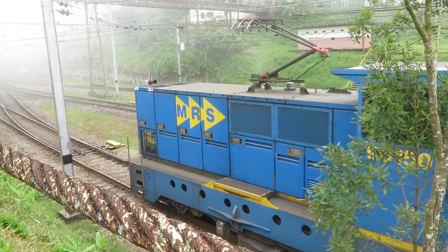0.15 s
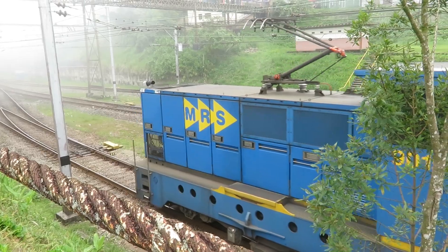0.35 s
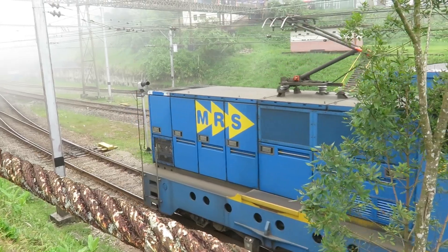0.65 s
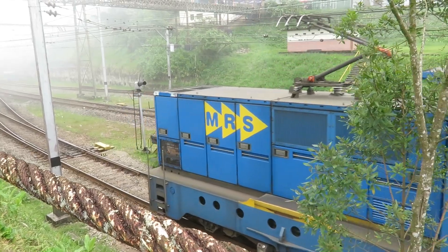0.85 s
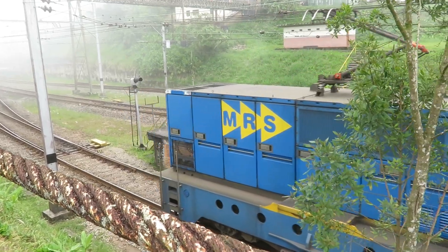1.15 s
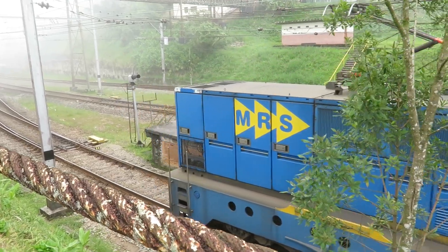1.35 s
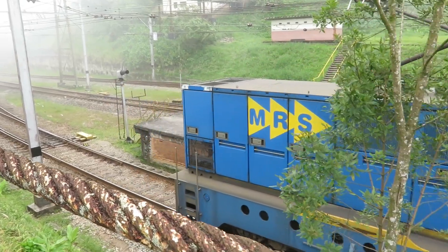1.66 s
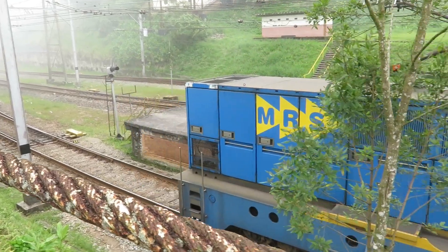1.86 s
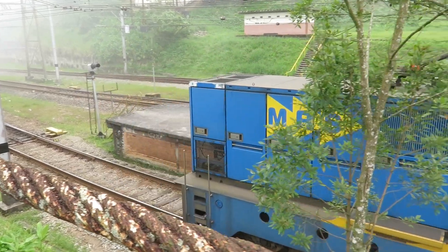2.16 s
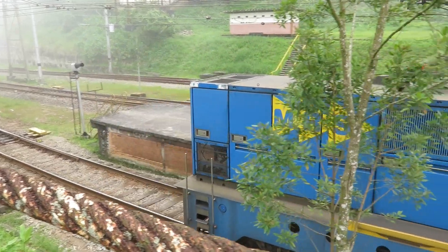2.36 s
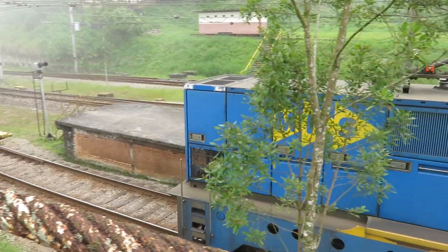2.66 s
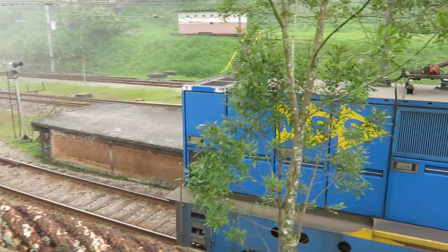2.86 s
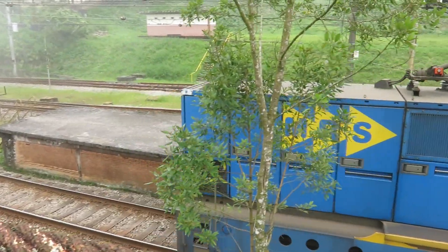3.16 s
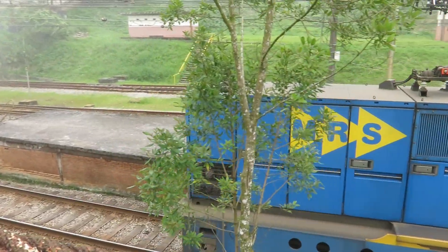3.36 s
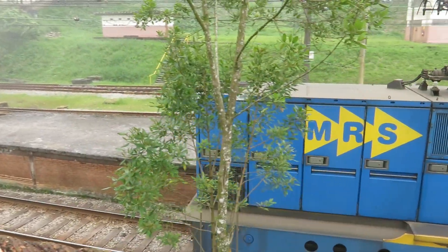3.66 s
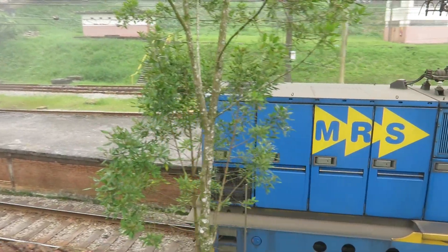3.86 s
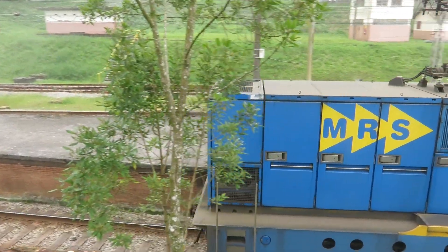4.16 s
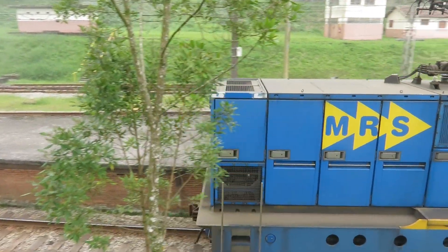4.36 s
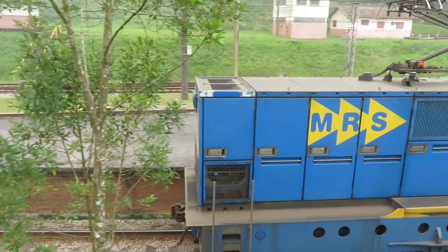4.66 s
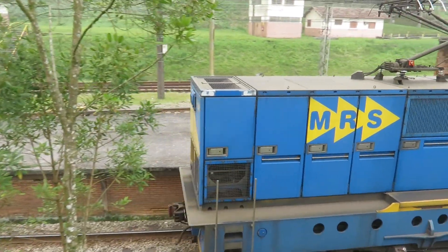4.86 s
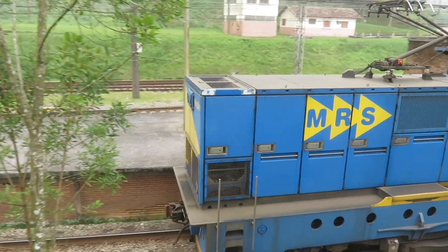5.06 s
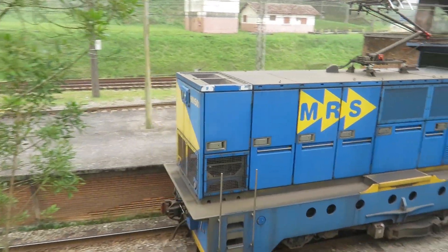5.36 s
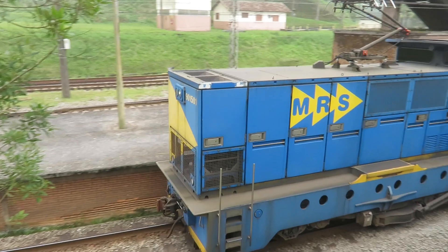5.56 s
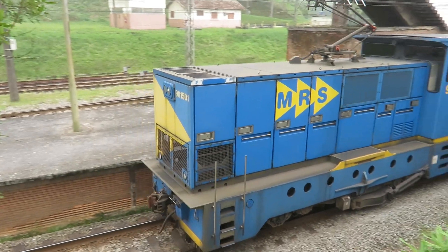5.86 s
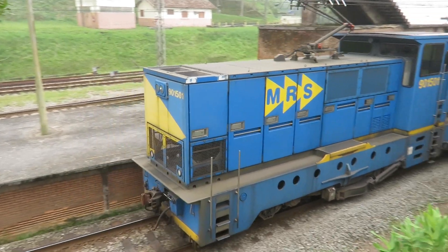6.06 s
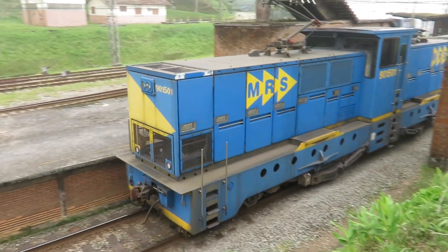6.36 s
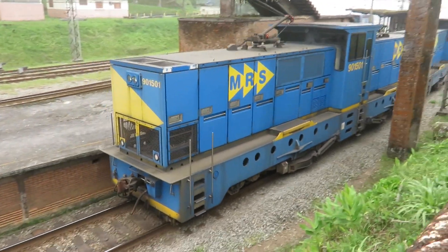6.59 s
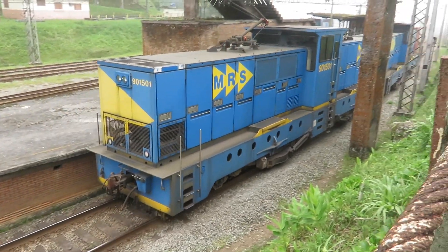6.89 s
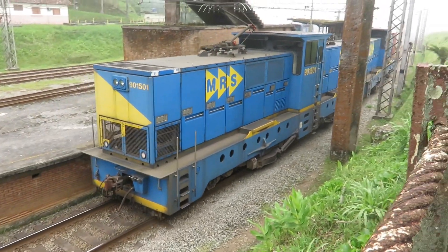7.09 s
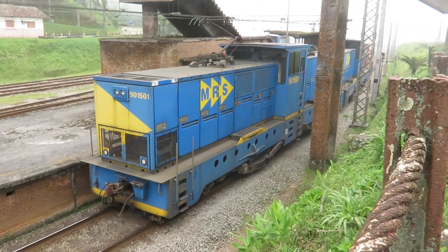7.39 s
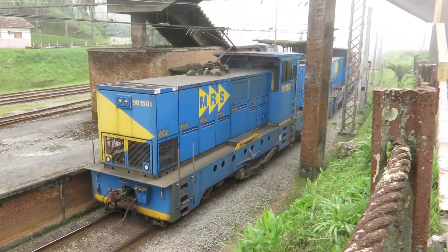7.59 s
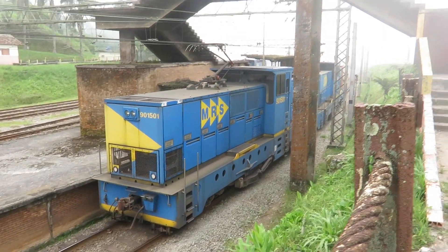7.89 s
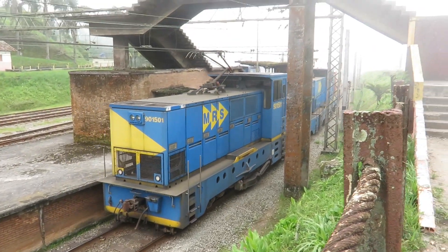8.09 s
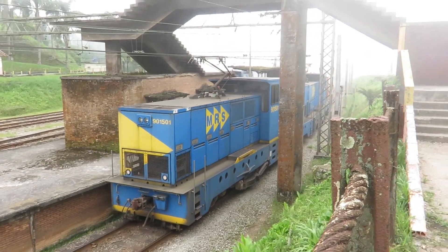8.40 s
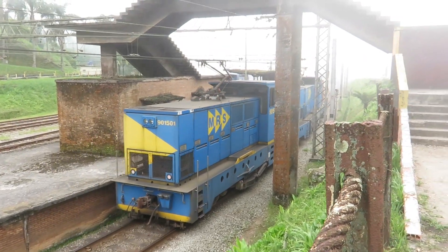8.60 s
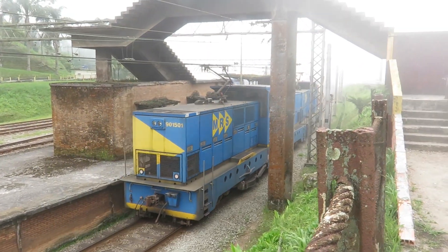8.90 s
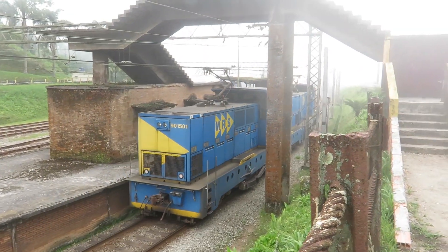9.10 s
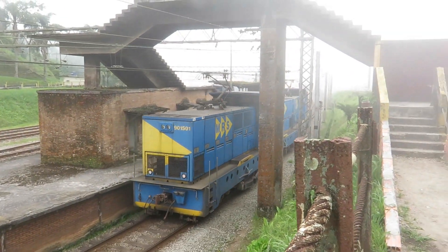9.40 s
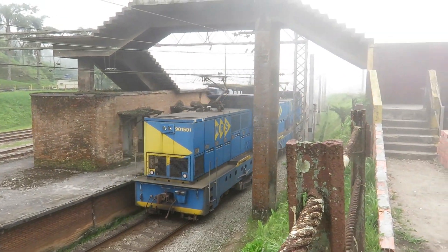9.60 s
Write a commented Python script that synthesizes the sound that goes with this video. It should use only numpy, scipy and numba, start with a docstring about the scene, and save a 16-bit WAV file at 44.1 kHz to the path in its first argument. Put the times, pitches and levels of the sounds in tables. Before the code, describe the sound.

Rolling roar and a siren-like whine from passing locomotives, broken by harsh wheel squeals, metallic clanks, gritty scuffs and a brief air hiss.

```python
"""Locomotives on a tight curve

Two electric locomotives roll slowly past in a rail yard, a few metres below the microphone.
Wheel flanges screech, sing and scuff as wheel modes and shaped noise; axles clank, rattle and thud over joints.
Compressed air bursts out once; a blower whines in steady lines over the flickering noise of rolling.
A camera's gain control ducks whenever the sound passes its limit, then creeps back."""
import sys
import numpy as np
from scipy import signal
from scipy.fft import rfft, irfft, next_fast_len
from scipy.io import wavfile
from scipy.ndimage import uniform_filter1d
from numba import njit

SR = 44100
rng = np.random.default_rng(int(sys.argv[2]) if len(sys.argv) > 2 else 0)


def transcribe(signal):
    """Save signal, clipped to [-1, 1], as a 16-bit WAV file at the path in sys.argv[1]."""
    frames = np.atleast_2d(signal).T
    limited = np.clip(frames, -1, 1)
    pcm = np.round(limited * 32767).astype(np.int16)
    wavfile.write(sys.argv[1], SR, pcm)


N = 429534
T = np.arange(N) / SR
TOP_HZ = 15600  # treble cut-off of the camera


def undb(db):
    """Decibels to gain."""
    return 10 ** (np.asarray(db) / 20)


def unit(x):
    """Scale to rms 1."""
    return x / np.sqrt(np.mean(np.abs(x) ** 2))


def curves(table, t):
    """The columns of a table of timed rows, at times t."""
    s, *columns = np.transpose(table)
    return [np.interp(t, s, c) for c in columns]


def envelope(t, rise, hold, t60):
    """Gain that rises from t = 0, holds, then dies away by 60 dB in t60 seconds."""
    fall_s = np.maximum(t - rise - hold, 0)
    return np.clip(t / rise, 0, 1) * undb(-60 * fall_s / t60)


def db_at(points, hz):
    """A spectrum of (frequency [Hz], level [dB]) points, joined on a log axis."""
    f, db = np.transpose(points)
    return np.interp(np.log(np.maximum(hz, 1)), np.log(f), db)


def shape(x, gain):
    """Filter by a gain that is a function of frequency."""
    size = next_fast_len(len(x), True)
    spectrum = rfft(x, size) * gain(np.fft.rfftfreq(size, 1 / SR))
    return irfft(spectrum, size)[:len(x)]


def noise(points, size):
    """Noise of a given colour, rms 1."""
    return unit(shape(rng.standard_normal(size), lambda f: undb(db_at(points, f))))


def bell(f, hz, width):
    """Power gain of one resonance."""
    return 1 / (1 + (2 * (f - hz) / width) ** 2)


def lift(resonances, f):
    """Gain of a set of (frequency [Hz], width [Hz], lift [dB]) resonances."""
    return undb(sum(db * bell(f, hz, width) for hz, width, db in resonances))


def walk(rate, size):
    """Smooth chance with spread near 1, changing about rate times a second."""
    step = max(int(SR / rate), 2)
    own = np.random.default_rng(rng.integers(2 ** 31))
    held = np.repeat(own.standard_normal(size // step + 3), step)
    smooth = uniform_filter1d(uniform_filter1d(held, step), step)
    return 1.35 * smooth[step:step + size]


def tone(hz, steady, flutter_rate):
    """A partial on a pitch curve: a steady direct part plus scattered parts that flutter; rms 1."""
    phase = 2 * np.pi * (np.cumsum(hz) / SR + rng.random())
    direct = (steady + walk(flutter_rate, len(hz))) * np.sin(phase)
    scattered = walk(flutter_rate, len(hz)) * np.cos(phase)
    return unit(direct + scattered)


def add(track, start, x):
    """Mix x into the track from a start time."""
    i = max(int(start * SR), 0)
    track[i:i + len(x)] += x[:N - i]


# Flange screeches: (start [s], length [s], level trim [dB], grinding trim [dB],
# contact at start, contact at end [0 flange root - 1 flange tip], pitch unsteadiness [share])
SCREECH_EVENTS = [(1.311, 0.34, -6, -6.5, 0, 0.7, .008), (1.655, 0.055, -13.5, -6, 0.7, .8, .003),
                  (1.712, 0.05, -8, -7, 0.9, .7, .003), (4.9575, 0.24, 0, -6, 0.3, 1, .01)]
# The wheel's modes: (frequency [Hz], drive from the flange root [dB], drive from the flange tip [dB])
WHEEL_MODES = [(1650, -9, -1), (1790, -3, 0), (1920, 0, -6), (2070, 1, -2), (2280, 8, 0), (2350, 5, 3),
               (2440, -1, 2), (2630, -2, -1), (2890, -12, 0), (3070, -9, 3), (3180, -5, -1), (3880, -2, -3),
               (4600, 3, -2), (4880, -7, -3), (5300, -5, 2), (5850, -7, -14), (6170, -4, 0), (6960, 0, -4),
               (7740, -6, -2), (8560, -11, -7), (9360, 0, -5), (10080, -5, -5), (10750, -2, -2),
               (11050, -6, -3), (11480, -1, -2), (11650, 1, -1), (12250, -7, 0), (12480, -2, -3),
               (13130, -2, -4), (13850, -5, -6)]
# Colour of the grinding: (frequency [Hz], relative level per Hz [dB])
GRIND_COLOUR = [(100, -37), (300, -5), (1000, 16), (1400, 12), (1800, 1), (2400, 6), (2800, 7), (4000, 13),
                (5000, 9), (8300, 9), (11500, 4.5), (13500, 5.5), (15500, 2)]
SCREECH_ATTACK_S, SQUEAL_T60_S, GRIND_T60_S = .006, 0.03, 0.093
BITE_DB, BITE_S = 2, .002  # the flange's first blow on the rail: extra squeal and its time constant


def screeches(grind_db=-3.5, squeal_db=-5.0, rasp_db=1.6):
    """A flange strikes the rail, then sticks and slips; as the contact slides, other wheel modes take over."""
    out = np.zeros(N)
    t = np.arange(2 * SR // 3) / SR
    twin_db, twin_spread = -5, .014  # the axle's other wheel slides in and out of tune
    swap_db = 4.5  # how far each mode's drive wanders
    ring_gain, ring_width_hz = 1.2, 130  # wheel modes standing out of the grinding

    def grind_rings(f):
        return 1 + ring_gain * sum(bell(f, mode[0], ring_width_hz) for mode in WHEEL_MODES)

    for start, length, db, grinding_db, first, last, unsteady in SCREECH_EVENTS:
        contact = np.clip(np.interp(t, [0, length], [first, last]), 0, 1)
        pull = 1 + unsteady * walk(55, len(t))  # uneven friction pulls the pitch
        squeal = 0
        for hz, root, tip in WHEEL_MODES:
            twin_hz = hz * (1 + twin_spread * walk(18, len(t)))
            contact_db = root + (tip - root) * contact
            for mode_hz, wheel_db in [(hz, 0), (twin_hz, twin_db)]:
                drive_db = wheel_db + contact_db + swap_db * walk(40, len(t))
                squeal = squeal + undb(drive_db) * tone(mode_hz * pull, steady=1.0, flutter_rate=170)
        bite_db = BITE_DB * np.exp(-t / BITE_S)
        squeal = unit(squeal) * undb(squeal_db + bite_db)
        squeal *= envelope(t, SCREECH_ATTACK_S, length, SQUEAL_T60_S)
        grind = unit(shape(noise(GRIND_COLOUR, len(t)), grind_rings))
        grind *= undb(grind_db + grinding_db) * envelope(t, SCREECH_ATTACK_S, length, GRIND_T60_S)
        rasp = rasp_db * walk(228.0, len(t))
        add(out, start, (squeal + grind) * undb(db + rasp))
    return out


# Single wheel modes: (start [s], rise [s], hold [s], settled pitch [Hz], level trim [dB], t60 [s],
# flutter rate [Hz], pitch offset at the start [Hz])
SINGING_MODES = [ (1.311, .006, .02, 1975, -6.5, .12, 120, 0), (1.310, .003, .008, 6240, -20, .06, 200, 0),
                 (1.312, .012, .11, 2295, -9.5, .15, 150, 50), (1.35, .045, .04, 4620, -10, .1, 130, 70),
                 (1.45, .01, .03, 7020, -15.5, .15, 140, 0), (1.51, .04, .07, 6180, -16, .2, 180, 0),
                 (1.555, .01, .07, 2440, -13.5, .15, 120, -70), (1.57, .02, .17, 3080, -19, .15, 130, 60),
                 (1.685, .01, .035, 6190, -17, .13, 120, 40), (1.712, .008, .04, 2360, -12.5, .24, 90, 110),
                 (1.712, .01, .04, 5445, -18.5, .15, 110, 0), (2.644, .019, .06, 2106, -18.5, 1.1, 30, 0),
                 (2.67, .03, .13, 4210, -40, .4, 220, 200), (2.65, .02, .16, 6300, -41.5, .3, 260, 120),
                 (2.8, .05, .02, 2106, -19.5, .7, 28, 0), (2.97, .1, .04, 2106, -20.5, .7, 30, 0),
                 (4.958, .001, .038, 2305, -1, .08, 323, 0), (4.958, .001, .038, 2490, -4, .08, 350, 0),
                 (5.075, .02, .035, 2315, -8.5, .14, 160, 90), (5.075, .01, .02, 2630, -10, .1, 160, 0),
                 (5.13, .03, .04, 5260, -15.5, .42, 180, 0), (5.16, .03, .03, 6125, -19.5, .36, 180, 0),
                 (5.25, .05, .04, 2850, -17.5, .35, 55, 0), (5.41, .025, .03, 2848, -16, .8, 60, 0),
                 (5.204, .05, .38, 3628, -27.5, 1.7, 55, 0), (5.8, .15, .75, 3635, -43, .6, 70, 0),
                 (6.405, .03, .02, 3085, -31, .22, 90, 50), (6.718, 0.035, 0.12, 5350, -35, .46, 183, 38),
                 (6.73, 0.044, 0.11, 6170, -48, .5, 200, 4), (6.73, .04, 0.09, 10680, -45, .5, 400, 0),
                 (8.067, .026, .14, 3670, -42.5, .5, 70.4, 7), (8.07, .02, 0.067, 6100, -45, 0.54, 159, 2),
                 (9.34, 0.0071, .01, 10200, -21.5, 0.39, 1026, 7)]
OVERTONE_DB = -35  # each overtone, relative to its pitch
PAIR_BEAT_HZ, PAIR_DEPTH = 16, .33  # a turning wheel splits each mode into a close pair: beat rate, depth (share)
SETTLE_S = .06  # time constant with which a mode settles on its pitch


def singing(steady=2.4):
    """Creep on the rail keeps wheel modes ringing and beating, with faint overtones; some glide onto pitch."""
    out = np.zeros(N)
    for start, rise, hold, hz, db, t60, flutter, offset_hz in SINGING_MODES:
        t = np.arange(int((rise + hold + t60) * SR)) / SR
        pitch = hz + offset_hz * np.exp(-t / SETTLE_S)
        overtones = sum(tone(k * pitch, steady, k * flutter) for k in (2, 3) if k * hz < TOP_HZ)
        ring = tone(pitch, steady, flutter) + undb(OVERTONE_DB) * overtones
        beat = 1 + PAIR_DEPTH * np.cos(2 * np.pi * PAIR_BEAT_HZ * (t - rise))
        add(out, start, ring * beat * undb(db) * envelope(t, rise, hold, t60))
    return out


# Short flange scuffs: (start [s], level trim [dB], length [s], centre of the treble lift [Hz])
SCUFF_EVENTS = [(0.045, -34, 0.026, 11200), (0.148, -37, 0.045, 11600), (0.467, -30, 0.042, 10900),
                (0.721, -25, 0.046, 11700), (0.801, -33, 0.045, 11600), (0.936, -29.5, 0.038, 11200),
                (1.19, -34, 0.035, 11400), (1.985, -38, 0.045, 11500), (2.278, -37, 0.11, 11430),
                (2.643, -25, 0.062, 11700), (2.837, -35.5, 0.11, 12100), (2.97, -34, 0.034, 10600),
                (3.193, -34, 0.029, 10800), (3.926, -31, 0.038, 12000), (4.373, -28.5, 0.075, 12300),
                (4.923, -20, 0.047, 12900), (5.77, -29.5, 0.044, 12000), (6.196, -32, 0.015, 13200),
                (6.223, -24.5, 0.013, 12100), (6.551, -19, 0.022, 11900), (6.576, -11, 0.0098, 10300),
                (6.59, -13, 0.0066, 11300), (6.737, -36.5, 0.12, 11500), (7.222, -25.5, 0.013, 11700),
                (7.421, -26, 0.037, 12200), (7.468, -14.5, 0.041, 11700), (7.524, -22.5, 0.11, 12600),
                (7.822, -21.5, 0.03, 11700), (7.92, -22.5, 0.032, 12000), (7.977, -24.5, 0.022, 11700),
                (8.051, -13, 0.0087, 10000), (8.56, -28, 0.043, 11600), (9.128, -32, 0.022, 12400),
                (9.217, -35, 0.03, 12000), (9.289, -30.5, 0.054, 10600), (9.341, -23, 0.029, 10700)]
# Colour of the spray: (frequency [Hz], relative level per Hz [dB])
SCUFF_COLOUR = [(200, -31), (1500, 7), (2400, 8.5), (4000, -5), (6500, -4), (8500, -8), (9700, -4.5),
                (10600, 4.5), (12500, -0.5), (14000, 1.5), (15500, -2)]
SCUFF_RING = 2.5  # how far the wheel's modes stand out of the spray (gain)


def scuffs(rise=0.012, t60=0.1, grit_db=0.5, ring_width=70, focus_db=7, focus_width=2200):
    """A flange grazes the rail: a gritty spray in the wheel's high modes, a different few each time."""
    out = np.zeros(N)
    t = np.arange(SR // 2) / SR
    for start, db, length, brightest in SCUFF_EVENTS:
        modes_hz = rng.uniform(5000, 15000, size=14)

        def rings(f):
            return 1 + SCUFF_RING * sum(bell(f, hz, ring_width) for hz in modes_hz)

        spray = shape(noise(SCUFF_COLOUR, len(t)), rings)
        spray = unit(shape(spray, lambda f: lift([(brightest, focus_width, focus_db)], f)))
        grit = grit_db * walk(250, len(t))
        add(out, start, spray * envelope(t, rise, length - rise, t60) * undb(db + grit))
    return out


# Axles over rail joints: (start [s], clank trim [dB], rattle trim [dB], body thud trim [dB],
# tilt of the clank's modes [dB per octave])
JOINT_EVENTS = [(0.051, -21, -20, -18, 9), (.181, -21, -36, -20, -2), (0.477, -13.5, -16.5, -16.5, 8),
                (.726, -18.5, -18.5, -27, 5), (.948, -12.5, -19.5, -24, -5), (1.2, -19, -19.5, -18.5, 12),
                (2.28, -26, -24, -19, 8), (2.353, -27, -15, -22, 15), (3.795, -32, -25.5, -16, 0),
                (3.942, -21, -25, -22, 3), (4.41, -29, -16, -20, -10), (5.19, -15, -20, -16, 12),
                (6.232, -22.5, -23, -23.5, -6), (6.563, -22, -23, -31, 7), (6.9, -20, -23.5, -31, -10),
                (7.473, -4.5, -17.5, -20, -6), (7.836, -16.5, -21, -49.5, -7),
                (7.935, -10.5, -21.5, -19, -4), (8.058, -17.5, -18.5, -19.5, -12),
                (8.58, -25, -34, -34, 21), (8.632, -24.5, -38, -41, 1), (9.078, -23, -22, -40, 22),
                (9.15, -18, -21.5, -24, 12), (9.305, -14, -24, -19, -1), (9.355, -19, -23.5, -27, 4)]
# What a struck wheel and rail ring with: (frequency [Hz], width [Hz], relative level [dB])
CLANK_MODES = [(687, 60, -8), (790, 56, -7), (848, 45, 2), (950, 41, -9), (1130, 40, -15), (1320, 39, -16),
               (1458, 25, -7.5)]
# Colour of the rattling gear: (frequency [Hz], relative level per Hz [dB])
RATTLE_COLOUR = [(300, -23), (600, 13), (1500, 4.5), (2400, 0), (4000, -3), (6500, -12), (9000, -15),
                 (15000, -20)]
# Colour of the body's thud: (frequency [Hz], relative level per Hz [dB])
THUD_COLOUR = [(20, -50), (45, -37), (90, -17), (170, -3.5), (260, 4), (380, 0.5), (600, -9), (2000, -42)]
CLANK_RISE_S, CLANK_HOLD_S, CLANK_T60_S = .003, .009, .09


def joints(thud_rise=0.011, thud_t60=0.36, vary_db=0.5, rattle_rise=0.017, rattle_t60=0.3, grain_db=3.0):
    """Each axle drops over a joint: wheel and rail clank, loose gear rattles on after them, the body thuds."""
    out = np.zeros(N)
    t = np.arange(SR // 2) / SR
    for start, clank_db, rattle_db, thud_db, tilt in JOINT_EVENTS:
        steel = 0
        for hz, width, db in CLANK_MODES:
            drive = undb(db + tilt * np.log2(hz) + vary_db * rng.standard_normal())
            # a wider resonance flutters faster
            steel = steel + drive * tone(np.full(len(t), hz), steady=3, flutter_rate=2 * width)
        clank = unit(steel) * envelope(t, CLANK_RISE_S, CLANK_HOLD_S, CLANK_T60_S)
        grain = undb(grain_db * walk(276, len(t)))
        rattle = noise(RATTLE_COLOUR, len(t)) * grain * envelope(t, rattle_rise, -rattle_rise, rattle_t60)
        # a hold of minus the rise lets the decay run from the very start
        thud = noise(THUD_COLOUR, len(t)) * envelope(t, thud_rise, -thud_rise, thud_t60)
        add(out, start, clank * undb(clank_db) + rattle * undb(rattle_db) + thud * undb(thud_db))
    return out


# Colour of the air jet: (frequency [Hz], relative level per Hz [dB])
AIR_COLOUR = [(88, -54), (150, -30), (175, -11), (290, -4), (339, -17), (471, -5.5), (595, -15), (827, -4),
              (1400, -3.5), (1800, -4.5), (3800, -6.5), (5000, -14), (7500, -18.5), (11100, -18),
              (15500, -23)]
# Resonances of the vent: (frequency [Hz], width [Hz], lift [dB])
VENT_RESONANCES = [(967, 37, 13.5), (1860, 70, 10), (2580, 13, 15), (3180, 430, 2)]
AIR_START_S, AIR_RISE_S, AIR_HOLD_S, AIR_T60_S, AIR_DB = 2.368, 0.03, 0.075, 0.33, -6
LEAK_DB, LEAK_HOLD_S, LEAK_T60_S = -20, 0.22, 1


def air(sputter_db=1.8, sputter_rate=190, darken=0.11):
    """Compressed air sputters out through a ringing vent, then leaks away, duller as the pressure falls."""
    t = T - AIR_START_S
    burst = undb(AIR_DB) * envelope(t, AIR_RISE_S, AIR_HOLD_S, AIR_T60_S)
    leak = undb(LEAK_DB) * envelope(t, AIR_RISE_S, LEAK_HOLD_S, LEAK_T60_S)
    flow = burst + leak
    jet = unit(shape(noise(AIR_COLOUR, N), lambda f: lift(VENT_RESONANCES, f)))
    treble = shape(jet, lambda f: f ** 2 / (f ** 2 + 4000 ** 2))
    jet = jet - treble * (1 - (flow / flow.max()) ** darken)
    return jet * flow * undb(sputter_db * walk(sputter_rate, N))


# Blade tone, sidebands spaced by about the shaft rate or multiples of it, and octave of the blade tone:
# (frequency before the pitch curve [Hz], relative level [dB])
BLOWER_LINES = [(1742, -17), (1896, -16.5), (1946, -4.5), (1996, 0), (2046, -1.5), (2096, -11), (2146, -22),
                (2197, -18.5), (3992, -21.5)]
# Pitch, sinking as the train goes by: (time [s], relative pitch [ratio])
BLOWER_PITCH = [(0, 1.0025), (4.4, 1.0003), (6.3, .9977), (9.74, .9968)]
# The whine against the roar of rolling: (time [s], relative level [dB])
WHINE_LEVELS = [(0, 0), (1.25, 1), (2.1, -.5), (3.3, -2), (4.1, 2), (4.9, 1), (5.5, -2.5), (5.9, -2),
                (6.1, 1), (7.3, .5), (7.55, -2), (7.9, 1), (8.25, -1.5), (8.8, 1.5), (9.74, 1.5)]


def blower(fade_db=0.5, fade_rate=12):
    """A siren-like blade tone with shaft sidebands wavers in uneven airflow; each line fades in reflections."""
    pitch = curves(BLOWER_PITCH, T)[0] + .0009 * walk(5, N) + .0011 * walk(45, N)
    lines = 0
    for hz, db in BLOWER_LINES:
        line_gain = undb(db + 1.3 * walk(14, N))
        lines = lines + line_gain * tone(hz * pitch, steady=1.7, flutter_rate=45)
    turbulence_db = .8 * walk(160, N)
    whine = unit(lines * undb(turbulence_db))
    roar_db = curves(PASSING_LEVELS, T)[0]
    whine_db = curves(WHINE_LEVELS, T)[0]
    return whine * undb(roar_db + whine_db + fade_db * walk(fade_rate, N))


# The passing train: (time [s], wheel-on-rail roar [dB], body rumble [dB], deep shudder [dB])
PASSING_LEVELS = [(0, -19.5, -25.5, -40.5), (1.25, -22.5, -25.5, -40.5), (2.1, -26.5, -30.5, -51),
                  (3.3, -24, -28, -54), (4.1, -24, -31.5, -49), (4.8, -22, -28, -49),
                  (6.2, -26, -34, -50.5), (7.6, -22.5, -30.5, -47.5), (8.1, -24.5, -31, -41.5),
                  (9.74, -27, -30.5, -42.5)]
# The roar's 0.98-1.7 kHz range against the rest: (time [s], relative level [dB])
ROAR_MIDS = [(0, 0.5), (2, -1), (3.3, -0.5), (4.7, 0), (6, -2.5), (9.74, -4.5)]
# Colour of the rolling noise: (frequency [Hz], relative level per Hz [dB])
ROLL_COLOUR = [(40, -31), (100, -21.5), (170, -8), (270, -2), (370, -4), (470, -9.5), (750, -3), (1100, -7),
               (1600, -9.5), (2400, -16), (3000, -21), (3500, -21.5), (5000, -28.5), (8500, -35.5),
               (12000, -33.5), (15500, -48)]
# Colour of the deep shudder: (frequency [Hz], relative level per Hz [dB])
SHUDDER_COLOUR = [(25, -28), (48, 4), (62, -3), (78, 9.5), (105, 4.5), (135, 12), (200, -47)]
# Resonances of body, rails and ducts: (frequency [Hz], width [Hz], lift [dB])
BODY_RESONANCES = [(252.5, 67, 4), (320, 74, 2), (817, 17, 3.5), (2750, 190, 5.5), (2972, 145, 14.5),
                   (3988, 123, 12)]
# Hum of motors and gears: (frequency [Hz], level relative to the roar [dB])
HUM_LINES = [(325, -12.5), (925, -15), (1023, -17.5), (1072, -16)]
HISS_DB = -17  # rail hiss, relative to the roar


def rolling(flicker_db=1.35, flicker_rate=22):
    """Wheel and rail roughness shakes the body: rumble, roar and hiss flicker separately over a wavering hum."""
    def band(lo, hi):
        def gain(f):
            return undb(db_at(ROLL_COLOUR, f)) * lift(BODY_RESONANCES, f) * (f >= lo) * (f < hi)
        return unit(shape(rng.standard_normal(N), gain))

    roar_db, rumble_db, shudder_db = curves(PASSING_LEVELS, T)
    rumble, roar, hiss = band(20, 450), band(450, 4300), band(4300, 16000)
    mids = shape(roar, lambda f: (f > 980) * (f < 1700))
    roar = roar + mids * (undb(curves(ROAR_MIDS, T)[0]) - 1)
    out = noise(SHUDDER_COLOUR, N) * undb(shudder_db)
    for layer, db in [(rumble, rumble_db), (roar, roar_db), (hiss, roar_db + HISS_DB)]:
        out += layer * undb(db + flicker_db * walk(flicker_rate, N))
    hum = sum(undb(db) * tone(np.full(N, hz), steady=0.85, flutter_rate=14) for hz, db in HUM_LINES)
    return out + hum * undb(roar_db)


def scatter(x, t60, gap):
    """Dense reflections that begin after a gap and die away."""
    t = np.arange(SR // 2) / SR
    tail = rng.standard_normal(len(t)) * undb(-60 * t / t60) * (t >= gap)
    return signal.fftconvolve(x, tail / np.linalg.norm(tail))[:N]


# Stereo width at the microphone: (frequency [Hz], side minus mid [dB])
STEREO_WIDTH = [(100, -52), (720, -50), (1000, -31), (1400, -21), (2000, -16.5), (3000, -9), (4000, -2.5),
                (8000, -4.5), (15000, -5)]
# Stereo lean at the microphone: (frequency [Hz], left minus right [dB])
STEREO_LEAN = [(850, 0), (2000, 1.1), (4000, 1.9), (9000, 2.8)]


def scene(echo_db=-5.5):
    """All sources and the platform's echo of the wheels, heard by two close microphone ports."""
    wheels = screeches() + scuffs() + joints()
    echo = undb(echo_db) * scatter(wheels, t60=0.37, gap=0.02)
    mid = wheels + echo + singing() + air() + blower() + rolling()
    # reflections off the moving train keep changing phase between the ports
    turn = 2 * walk(30, N)
    diffuse = np.cos(turn) * scatter(mid, t60=.07, gap=.002)
    diffuse += np.sin(turn) * scatter(mid, t60=.07, gap=.002)
    side = shape(diffuse, lambda f: undb(db_at(STEREO_WIDTH, f)))
    left = shape(mid + side, lambda f: undb(db_at(STEREO_LEAN, f) / 2))
    right = shape(mid - side, lambda f: undb(-db_at(STEREO_LEAN, f) / 2))
    return np.array([left, right])


@njit
def duck(excess, attack, hold, release):
    """Gain reduction in dB: rises toward the excess level, holds, then falls at a fixed pace."""
    out, cut, wait = np.empty(len(excess)), 0., 0.
    for i in range(len(excess)):
        if excess[i] > cut:
            cut += (excess[i] - cut) * attack
            wait = hold
        elif wait > 0:
            wait -= 1
        else:
            cut = max(cut - release, 0.)
        out[i] = cut
    return out


LOW_CUT_HZ = 54


def record(dry, limit_db=-11.0, attack_s=0.0044, hold_s=0.18, recover_db_per_s=17.5):
    """The camera's gain control, its bass cut, its ceiling and its treble cut-off."""
    power = uniform_filter1d(np.mean(dry ** 2, axis=0), size=256)
    excess = 10 * np.log10(np.maximum(power, 1e-12)) - limit_db
    cut = duck(excess, 1 / (attack_s * SR), float(hold_s * SR), recover_db_per_s / SR)
    bass_cut = signal.butter(2, LOW_CUT_HZ, "high", fs=SR, output="sos")
    held = signal.sosfilt(bass_cut, dry * undb(-cut))
    treble_cut = signal.ellip(8, .2, 70, TOP_HZ, fs=SR, output="sos")
    return signal.sosfilt(treble_cut, np.clip(held, -1, 1))


dry = scene()
out = record(dry)
transcribe(out)
```